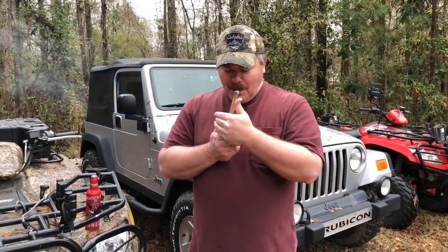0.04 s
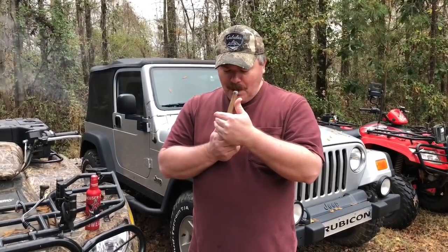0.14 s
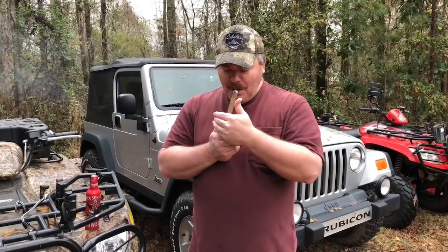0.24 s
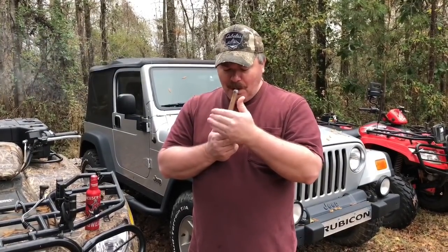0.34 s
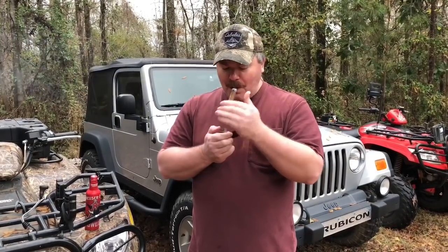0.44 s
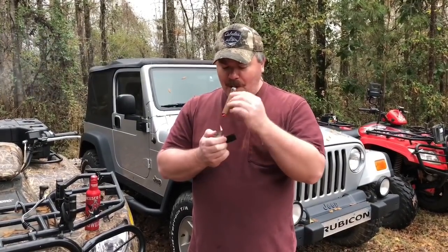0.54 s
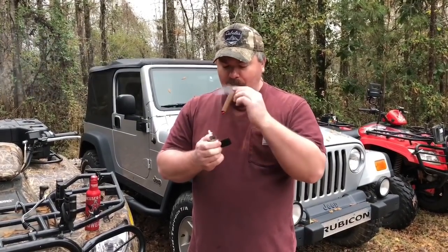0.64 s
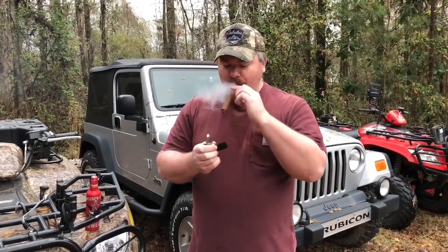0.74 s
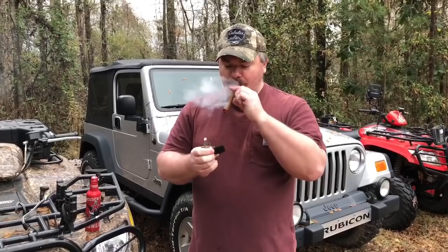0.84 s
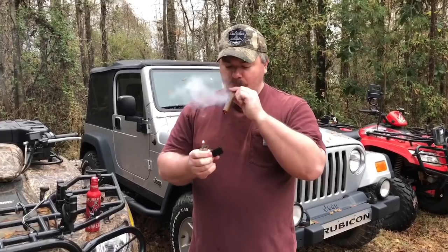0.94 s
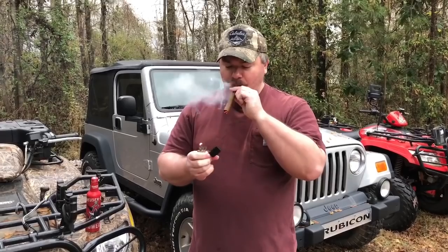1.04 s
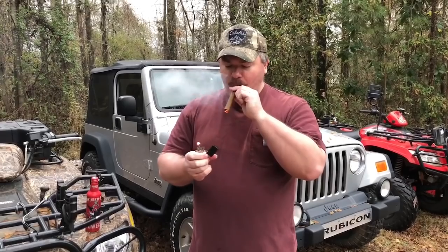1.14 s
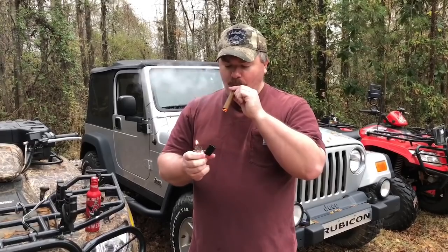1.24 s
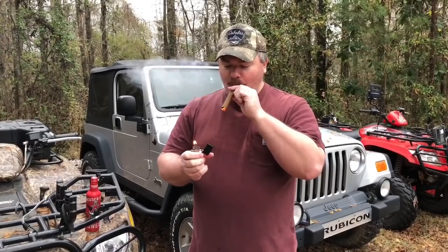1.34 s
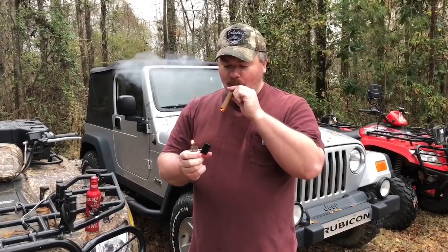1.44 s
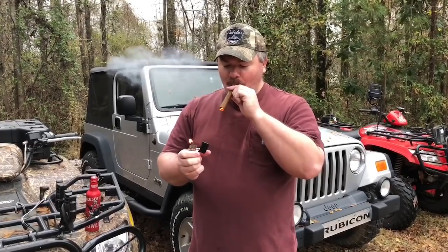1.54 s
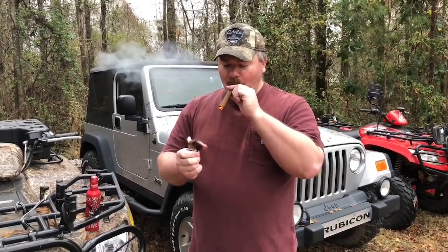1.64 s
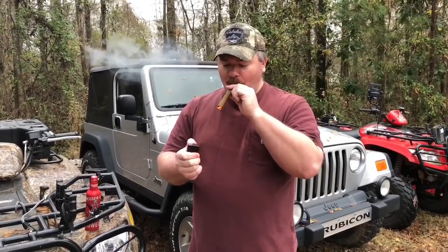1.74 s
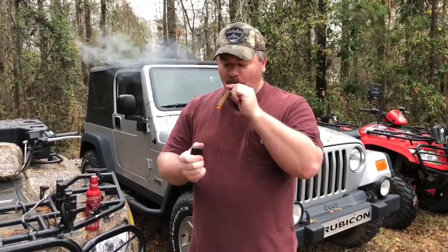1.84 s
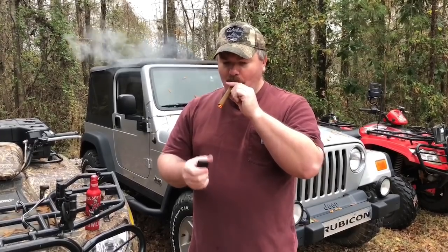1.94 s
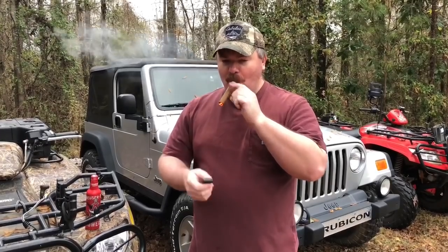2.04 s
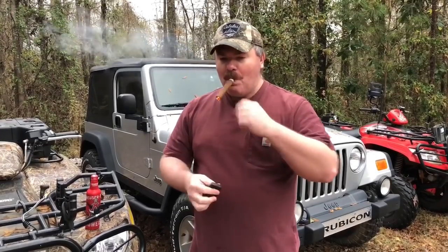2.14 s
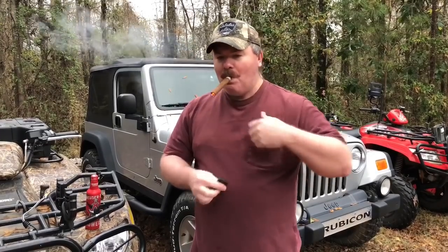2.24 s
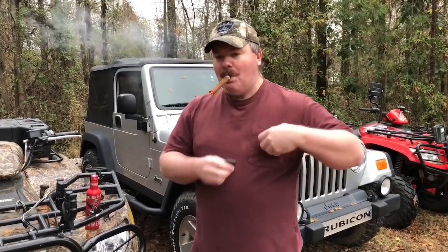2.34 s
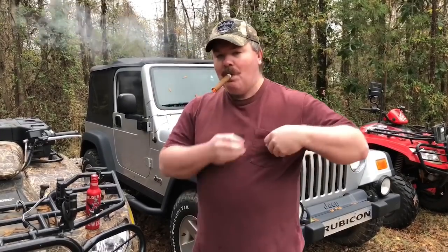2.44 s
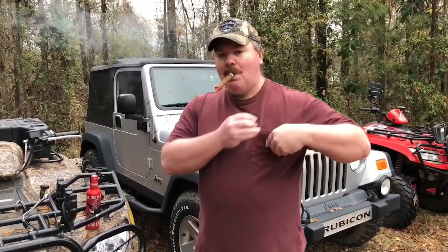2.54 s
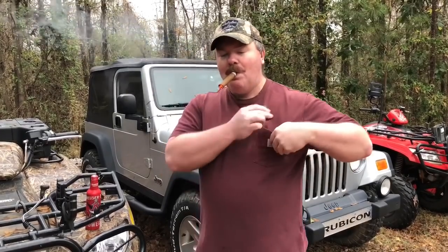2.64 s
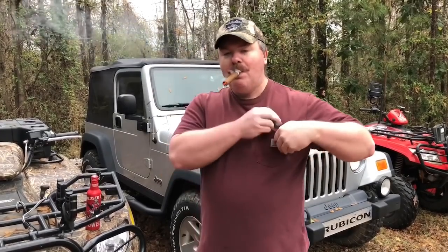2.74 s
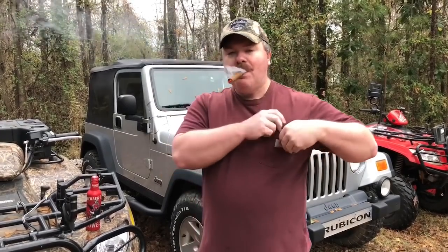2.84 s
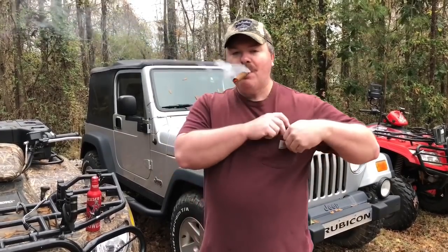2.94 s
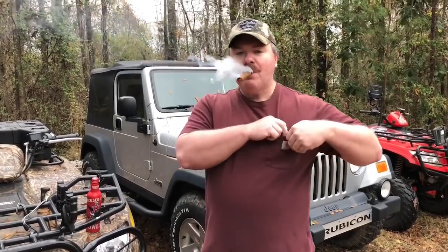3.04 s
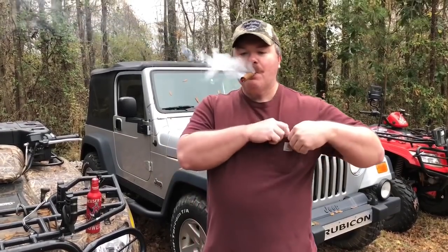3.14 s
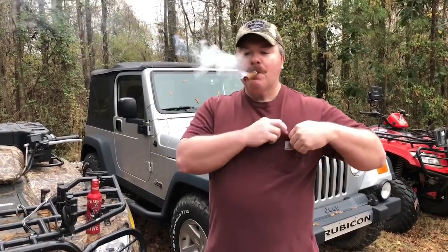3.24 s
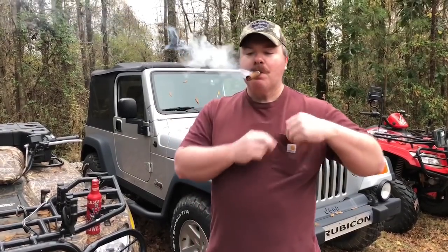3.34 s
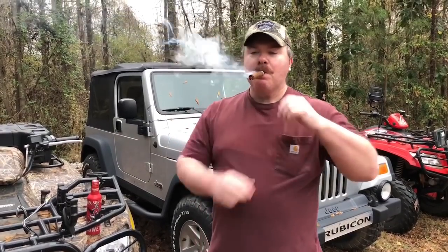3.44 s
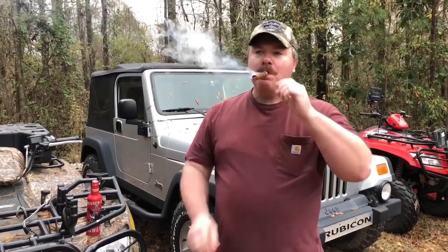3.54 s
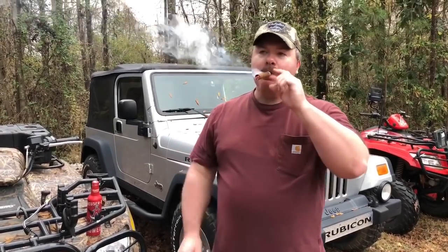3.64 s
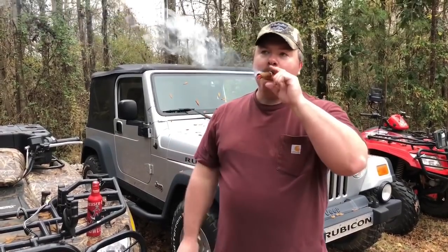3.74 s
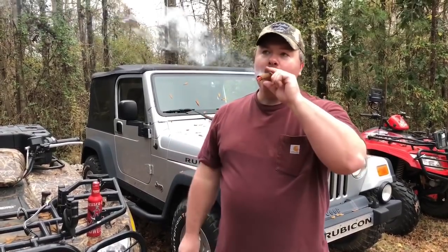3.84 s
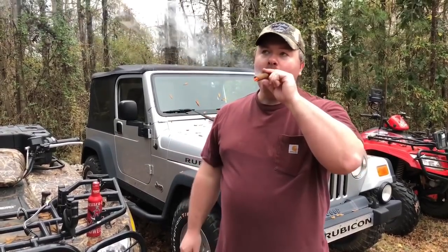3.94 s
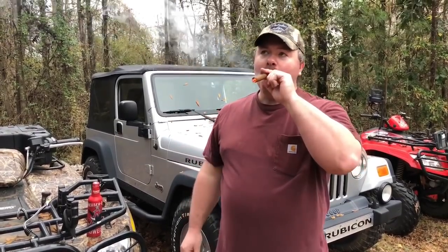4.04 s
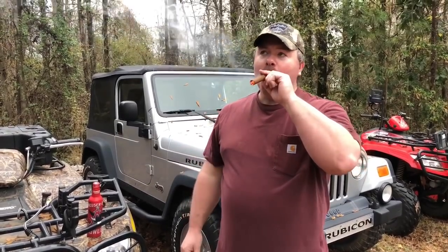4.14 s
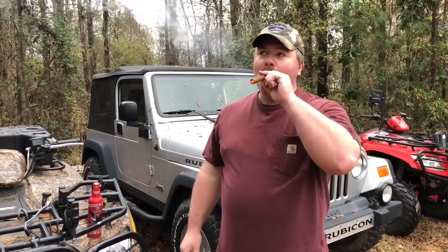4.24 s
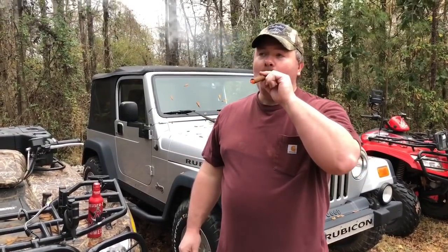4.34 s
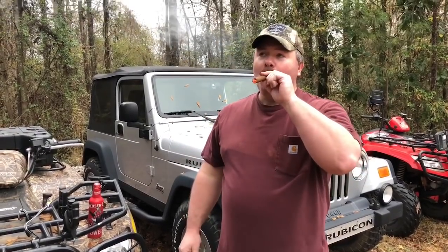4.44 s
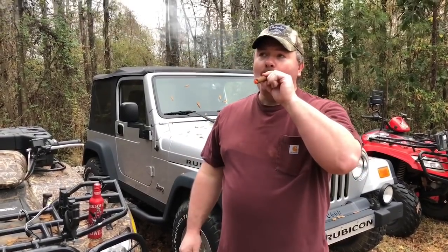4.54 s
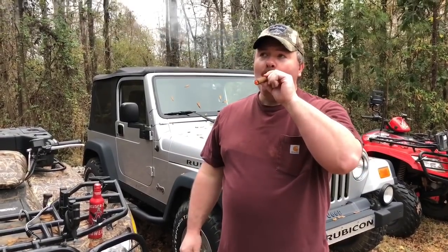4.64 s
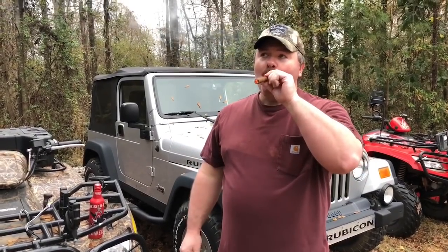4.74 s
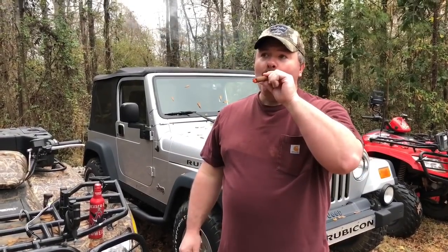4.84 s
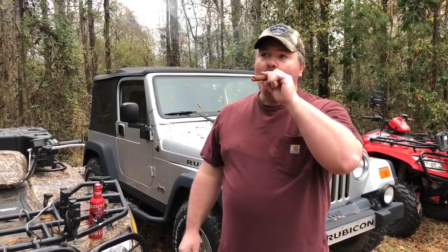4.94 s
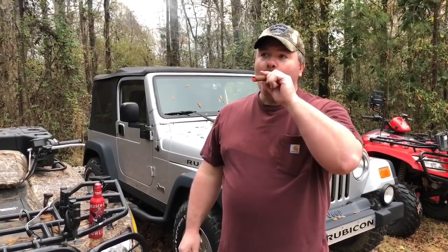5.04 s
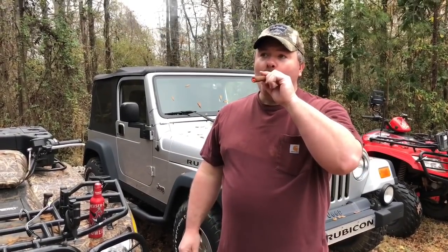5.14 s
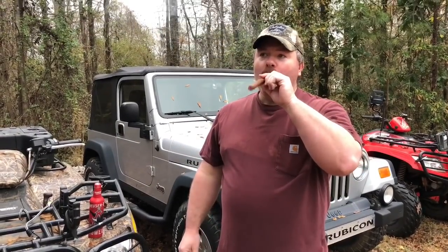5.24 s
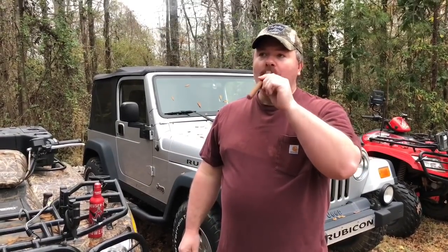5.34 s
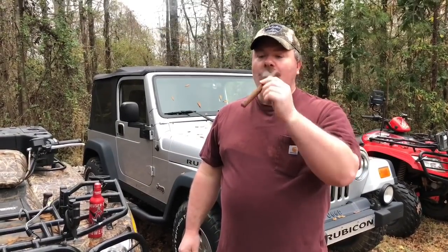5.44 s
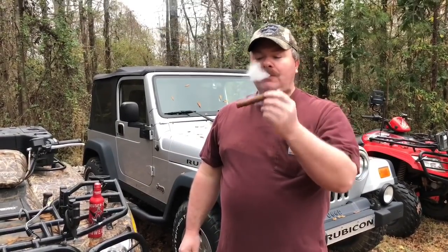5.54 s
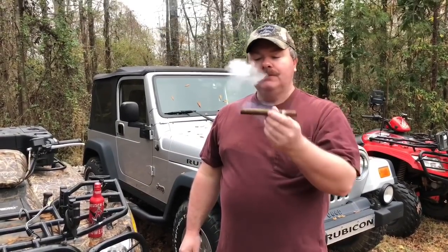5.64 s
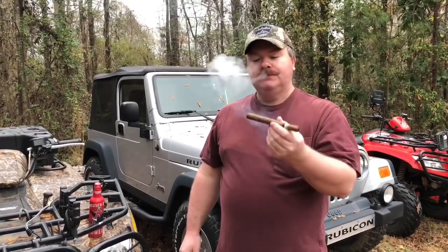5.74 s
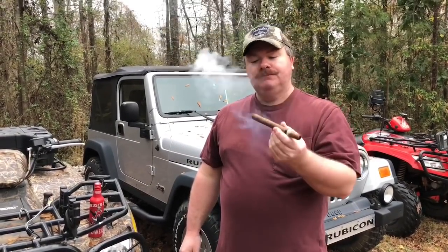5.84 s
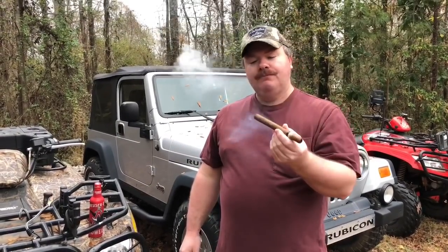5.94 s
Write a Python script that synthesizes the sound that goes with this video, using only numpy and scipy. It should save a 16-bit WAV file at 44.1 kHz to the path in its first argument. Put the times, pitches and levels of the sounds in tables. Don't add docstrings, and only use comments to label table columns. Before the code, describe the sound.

Outdoors among trees, a metal lighter clicks shut once, hard and bright; faint traffic murmur, sparse bird whistles, and tiny cloth rustles surround it.

```python
import sys
import numpy as np
from scipy import signal
from scipy.fft import rfft, irfft, next_fast_len
from scipy.io import wavfile
from scipy.ndimage import uniform_filter1d, map_coordinates

SR = 44100
rng = np.random.default_rng(int(sys.argv[2]) if len(sys.argv) > 2 else 0)


def linear_from_db(decibels):
    return 10 ** (np.asarray(decibels, float) / 20)


def bounce(signal):
    frames = np.transpose(np.atleast_2d(signal))
    limited = np.clip(frames, -1, 1)
    pcm = np.round(limited * 32767).astype(np.int16)
    wavfile.write(sys.argv[1], SR, pcm)


N = 264776
T = np.arange(N) / SR

# frequency_hz, density_db
RUMBLE_SPECTRUM = [(12, -60), (20, -35.5), (43, -9), (76, 2), (150, -6), (214, -12.5), (242, -16.5),
                   (400, -24.5), (520, -51), (880, -120)]
# frequency_hz, density_db
ROAR_SPECTRUM = [(150, -38.5), (250, -8), (320, -9.5), (545, -9), (790, -2.5), (995, -3.5), (1580, -7.5),
                 (2300, -16.5), (3200, -25), (4720, -31.5), (7000, -37), (10000, -41), (14000, -42),
                 (17200, -38.5)]
# time_s, level_db
TRAFFIC_LEVEL = [(0, -47), (.3, -51.5), (1.8, -50), (2.1, -52.5), (3.1, -50), (3.5, -51), (6, -52)]
ROAR_DB, ROAR_FADE_DB_PER_S = -54, 0.094
# time_s, pitch_hz, level_db
MOTOR_HUM = [(0, 292, -67.5), (1.34, 292.6, -61), (2.6, 295.7, -62.5), (3.6, 294.1, -67.5),
             (5.5, 294.4, -71.5), (6, 293.5, -65)]
# start_s, length_s, start_pitch_hz, end_pitch_hz, level_db
ENGINE_PASSES = [(0, 0.32, 184.7, 186, -62.5), (.35, 0.98, 186, 180, -58.5), (1.0, 1.03, 60, 60, -55),
                 (1.6, 1.53, 165.3, 152.4, -61.5), (2.151, 0.82, 315.3, 310, -68),
                 (2.302, 0.82, 105.6, 102.5, -56), (3.3, .9, 211.4, 216, -65),
                 (3.599, 1.45, 62.2, 58.7, -57.5), (4.9, 0.61, 218, 214.2, -66.5),
                 (5.5, 0.41, 184.8, 181.8, -61.5)]

# frequency_hz, density_db
CLOTH_SPECTRUM = [(2500, -120), (4000, -9), (8000, -3), (16000, 0.5), (20000, 0)]
# frequency_hz, density_db
LEAF_SPECTRUM = [(2500, -120), (4000, -2.5), (6000, -1), (8000, -3), (12000, -120)]
# peak_s, level_db, dying_time_s
SLEEVE_STROKES = [
    (1.65, -86.5, .5),
    (2.41, -77, .06),
    (2.48, -77.5, .05),
    (3.15, -75.5, .08),
    (3.29, -79, .15),
    (3.98, -74.5, .25),
    (4.8, -88, .15),
]
# peak_s, level_db, dying_time_s
BREEZE_GUSTS = [
    (.5, -89, .5),
    (4.8, -80.5, .2),
    (5.4, -82.5, .2),
]
SWELL_SHARE, STILL_DB = 0.76, -94

# start_s, start_pitch_hz, resting_pitch_hz, level_db
NEAR_CHIPS = [
    (.641, 8250, 7520, -58),
    (1.075, 7750, 7350, -71),
    (1.43, 8300, 7750, -82),
    (2.645, 7950, 7450, -73),
    (3.038, 8930, 7400, -63),
    (4.978, 8000, 7550, -83),
    (5.03, 7600, 7520, -83.5),
    (5.088, 7960, 7500, -83),
]
# start_s, length_s, pitch_hz, glide_percent, level_db
FARTHER_NOTES = [(2.01, .05, 4550, 3, -76), (2.09, 0.068, 4530, -1.5, -75), (2.23, 0.053, 4380, -10.5, -75),
                 (2.3, .07, 3760, 1, -78), (2.42, 0.093, 3900, 0, -75.5), (2.5, .1, 4500, -2, -75.5),
                 (4.57, 0.059, 4250, 4, -71), (4.64, .03, 4130, -10.5, -75.5), (5.04, .1, 4507, 0, -77),
                 (5.26, .06, 4350, -5, -76), (5.33, .05, 3920, -6, -75.5)]
# start_s, length_s, top_pitch_hz, level_db
FAR_WHISTLES = [
    (3.553, .044, 4780, -65),
    (3.906, .062, 4580, -66),
    (4.197, .047, 4650, -66),
    (4.498, .042, 4500, -70),
    (4.985, .05, 4580, -73),
]
GRACE_LEVELS = [-71.5, -73, -68.5]
# start_s, length_s, pitch_hz, glide_percent, level_db
FAR_ASIDES = [
    (4.25, .015, 4400, 9, -71),
    (4.69, .025, 3950, -8, -73),
    (4.905, .04, 3700, -4, -76),
    (5.215, .045, 4500, -11, -74),
]

# start_s, peak_level_db, centre_hz
FIBRE_CRACKS = [(.7444, -62, 8020), (.8344, -67, 14510), (1.5526, -66, 9000), (1.6685, -67, 14000),
                (1.6797, -54, 15000), (1.7184, -64, 14500), (1.7432, -44, 13130), (1.928, -60, 7460),
                (2.451, -64, 10500), (2.488, -63, 15000), (2.729, -63, 14500), (2.2964, -68, 5500),
                (2.9854, -53, 16000), (3.4064, -62, 6000), (3.695, -52, 16000), (3.8084, -63, 8530),
                (3.8524, -57.5, 6500), (3.9083, -50, 10980), (3.9475, -56.5, 12000), (3.972, -62, 10000),
                (3.9895, -65, 8985), (4.0174, -63, 15000), (4.0712, -51, 6500), (4.197, -67, 15000),
                (4.2194, -61, 9490), (4.2546, -63.5, 9500), (4.2714, -60, 7000), (4.298, -67, 14000),
                (4.9194, -72, 11950)]
FAINT_DB, FAINT_OCTAVES, OCTAVES_PER_DB, WIDEST_OCTAVES = -62, .4, .1, 1.2
# start_s, peak_level_db, centre_hz, width_octaves
CASE_KNOCKS = [
    (1.722, -52, 2800, 0.13),
    (2.3612, -57, 4200, .36),
    (2.8376, -53, 3500, 0.32),
    (2.8415, -56, 3600, .35),
    (2.878, -48, 3400, .12),
    (2.8927, -63, 4490, .3),
]
# frequency_multiple, peak_level_db
DROP_PARTIALS = [(1, -50), (2, -55), (3, -57), (5, -65)]
DROP_S, DROP_HZ = 2.8762, 1690

# start_s, level_db, decay_t60_s
CAM_FLIP = [
    (1.7499, -41, .06),
]
# frequency_hz, density_db
CAM_SPECTRUM = [(1180, -46), (2000, -18), (2970, 2.5), (7870, -8.5), (9120, -27.5), (9900, -15.5),
                (15400, -16.5), (18000, -32)]
# start_s, blow_db, contact_time_ms, brightness_db_per_octave
LID_CONTACTS = [
    (1.7633, -20, 6, 4),
    (1.7657, 13.5, .005, -1.5),
    (1.7661, -10, .4, 1),
    (1.7667, -6, .4, 1),
    (1.7671, -9, .7, 1),
]
BLOW_S = LID_CONTACTS[1][0]
# centre_hz, width_hz, level_db
CASE_MODES = [(1375, 250, -9.5), (1824, 230, -2.5), (2380, 220, -7.5), (2765, 250, -1), (3390, 500, -6.5),
              (4350, 600, -2), (4950, 500, -4.5), (6300, 1300, -6.5), (8790, 394, -11.5), (10084, 420, -2),
              (12430, 440, -7.5), (14990, 500, -4), (15950, 400, -6), (16950, 340, -3)]
# pitch_hz, level_db, decay_t60_s
SHELL_MODES = [(1380, -32.5, 0.032), (1787, -25.5, .05), (2050, -30, 0.074), (2350, -49.5, 0.3975),
               (2377.1, -29.5, 0.058), (3060, -40, .06), (4360, -37.5, 0.07), (10100, -41, .06),
               (10000, -59, .4)]
# frequency_hz, density_db
RADIATED_SPECTRUM = [(1180, -30.5), (2000, 0), (2190, -7.5), (2350, -3.5), (3030, -11.5), (4720, -7.5),
                     (5400, -11), (17300, -8.5)]
# frequency_hz, decay_t60_s
TREE_DECAY = [(1000, .3), (3000, 0.94), (5000, 0.59), (8000, 0.47), (16000, .32)]
FIRST_WALL_S, NEXT_WALL, WALL_DB, WALL_LOSS_DB_PER_S = .0032, 1.33, -22.5, 560


def unit(x):
    return x / np.sqrt(np.mean(x ** 2) + 1e-20)


def along(points, hz):
    f, v = np.transpose(points)
    return np.interp(np.log(hz + 1), np.log(f + 1), v)


def curves(rows):
    s, *columns = np.transpose(rows)
    return [np.interp(T, s, column) for column in columns]


def wobble(rate):
    knots = rng.standard_normal(int(N * rate / SR) + 4)
    return map_coordinates(knots, [T * rate])


def filtered(x, response):
    m = next_fast_len(len(x) + 8192)
    spectrum = rfft(x, m) * response(np.fft.rfftfreq(m, 1 / SR))
    return irfft(spectrum, m)[:len(x)]


def noise(spectrum, length):
    white = rng.standard_normal(length)
    return unit(filtered(white, lambda hz: linear_from_db(along(spectrum, hz))))


def add(track, s, sound):
    part = track[round(s * SR):][:len(sound)]
    part += sound[:len(part)]


def trees(x, gap):
    hz, t, z = signal.stft(rng.standard_normal(SR // 2), SR, nperseg=256)
    decay = linear_from_db(-60 * t / along(TREE_DECAY, hz)[:, None])
    tail = signal.istft(z * decay, SR, nperseg=256)[1]
    tail = np.pad(tail / np.linalg.norm(tail), (round(gap * SR), 0))
    return signal.fftconvolve(x, tail)


def traffic():
    rumble_db = curves(TRAFFIC_LEVEL)[0]
    rumble = linear_from_db(rumble_db - 0.5 + 0.83 * wobble(6.1)) * noise(RUMBLE_SPECTRUM, N)
    roar_db = ROAR_DB - ROAR_FADE_DB_PER_S * T
    roar = linear_from_db(roar_db + 0.5 + .4 * wobble(3.3) + 0.51 * wobble(10)) * noise(ROAR_SPECTRUM, N)
    hz, db = curves(MOTOR_HUM)
    hum_gain = linear_from_db(db + 2.0 + 1.3 * wobble(3.3))
    hum = hum_gain * np.sin(2 * np.pi * np.cumsum(hz + 0.53 * wobble(6)) / SR)
    return rumble + roar + hum


def engines():
    out, drift_hz = np.zeros(N), 2.5 * wobble(8)
    for s, length, start_hz, end_hz, db in ENGINE_PASSES:
        u = np.arange(round(length * SR)) / (length * SR)
        hz = start_hz + (end_hz - start_hz) * u + np.resize(drift_hz[round(s * SR):], len(u))
        envelope = linear_from_db(db + 2.0) * np.sin(np.pi * u) ** .6
        add(out, s, envelope * np.sin(2 * np.pi * np.cumsum(hz) / SR))
    return out * linear_from_db(2.7 * wobble(8))


def swells(rows):
    s, db, dying = np.transpose(rows)[:, :, None]
    fall_db = 10 * np.maximum((T - s) / dying, (s - T) / (SWELL_SHARE * dying))
    return np.maximum((db - fall_db).max(axis=0), STILL_DB)


def rustle():
    grain = linear_from_db(2.5 * wobble(40) + 3 * wobble(400))
    sleeve = linear_from_db(swells(SLEEVE_STROKES)) * unit(grain * noise(CLOTH_SPECTRUM, N))
    leaves = linear_from_db(swells(BREEZE_GUSTS) + 1.5 * wobble(11)) * noise(LEAF_SPECTRUM, N)
    return sleeve + leaves


def bird(notes, turn, swell, warble_hz, flutter_db, dry_db, wet_db):
    out = np.zeros(N)
    flutter, warble = linear_from_db(flutter_db * wobble(90)), warble_hz * wobble(70)
    for s, length, start_hz, turn_hz, end_hz, db in notes:
        u = np.arange(round(length * SR)) / (length * SR)
        hz = np.interp(u, [0, turn, 1], [start_hz, turn_hz, end_hz])
        hz = uniform_filter1d(hz, size=len(u) // 4, mode="nearest")
        hz = hz + warble[round(s * SR):][:len(u)]
        envelope = linear_from_db(db + 3.5) * np.sin(np.pi * u ** swell) ** 0.39
        note = envelope * np.sin(2 * np.pi * np.cumsum(hz) / SR)
        add(out, s, linear_from_db(dry_db) * note)
        add(out, s, linear_from_db(wet_db) * trees(note, gap=.008))
    return out * flutter


def chips():
    return [(s, .037, start_hz, hz, hz, db) for s, start_hz, hz, db in NEAR_CHIPS]


def ticks():
    out, t = np.zeros(N), T[:SR // 100]
    cracks = []
    for s, db, hz in FIBRE_CRACKS:
        octaves = FAINT_OCTAVES + OCTAVES_PER_DB * (db - FAINT_DB)
        cracks.append((s, db, hz, min(octaves, WIDEST_OCTAVES)))
    drop = [(DROP_S, db, k * DROP_HZ, .15) for k, db in DROP_PARTIALS]
    for s, db, centre_hz, octaves in cracks + CASE_KNOCKS + drop:
        width = max(octaves, .12)
        burst = rng.standard_normal(len(t)) * np.exp(-t / .0006)
        burst = filtered(burst, lambda hz: np.exp(-.5 * (np.log2(hz / centre_hz + 1e-3) / width) ** 2))
        add(out, s, linear_from_db(db + 3.5) * burst / np.abs(burst).max())
    return out


def case_response(hz):
    response = linear_from_db(-18.5)
    for k, (centre, width, db) in enumerate(CASE_MODES):
        damping = 1j * hz * width
        response = response + (-1) ** k * linear_from_db(db) * damping / (centre ** 2 - hz ** 2 + damping)
    return response


def lid():
    force, t = np.zeros(N), T[:SR // 50]
    for s, db, ms, tilt_db in LID_CONTACTS:
        scrape = np.r_[1, rng.standard_normal(len(t) - 1)] * np.exp(-t * 1000 / ms)
        add(force, s, linear_from_db(db) * filtered(scrape, lambda hz: linear_from_db(tilt_db * np.log2(hz / 6000 + 0.06))))
    snap = linear_from_db(4.0) * filtered(force, case_response)
    t = T[:SR // 2]
    ring = sum(linear_from_db(db - 60 * t / t60) * np.sin(2 * np.pi * hz * t) for hz, db, t60 in SHELL_MODES)
    add(snap, BLOW_S, ring * (1 - np.exp(-t / .0006)))
    for s, db, t60 in CAM_FLIP:
        add(snap, s, linear_from_db(db - 60 * t / t60) * noise(CAM_SPECTRUM, len(t)))
    radiate = signal.butter(8, 1150, "highpass", fs=SR, output="sos")
    return signal.sosfilt(radiate, snap) + linear_from_db(-11) * snap


def clearing(x):
    early, t = np.zeros(SR // 10), T[:SR // 200]
    for delay in FIRST_WALL_S * NEXT_WALL ** np.arange(9):
        db = WALL_DB - WALL_LOSS_DB_PER_S * (delay - FIRST_WALL_S)
        smear = rng.standard_normal(len(t)) * np.exp(-t / 0.00084)
        add(early, delay, linear_from_db(db) * smear / np.linalg.norm(smear))
    out = x + signal.fftconvolve(x, early)[:N]
    answer = filtered(trees([1], gap=.006), lambda hz: linear_from_db(along(RADIATED_SPECTRUM, hz)))
    add(out, BLOW_S, linear_from_db(-3.5) * answer)
    return out


def glides(rows, turn):
    notes = []
    for s, length, hz, percent, db in rows:
        start_hz = hz * (1 - turn * percent / 100)
        end_hz = hz * (1 + (1 - turn) * percent / 100)
        notes.append((s, length, start_hz, hz, end_hz, db))
    return notes


def song():
    graces = [(s - .035, .013, 5350, 4950, 3650, db) for (s, *_), db in zip(FAR_WHISTLES, GRACE_LEVELS)]
    whistles = []
    for s, length, hz, db in FAR_WHISTLES:
        end_hz = hz - 5500 * length - 2.2 * max(hz - 4560, 0)
        whistles.append((s, length, 3500, hz, end_hz, db))
    return graces + whistles + glides(FAR_ASIDES, turn=.4)


def scene():
    near = bird(chips(), turn=.4, swell=0.96, warble_hz=60, flutter_db=2, dry_db=1.0, wet_db=-7)
    far = bird(song(), turn=.13, swell=.8, warble_hz=35, flutter_db=1.5, dry_db=0, wet_db=-4.5)
    farther = bird(glides(FARTHER_NOTES, turn=.4), turn=0.3994, swell=0.65, warble_hz=140, flutter_db=3,
                   dry_db=-10, wet_db=-2.5)
    lighter = clearing(lid())
    return (lighter + near + far + farther + ticks() + rustle() + traffic() + engines())[None]


def low_pass(x):
    return signal.sosfilt(signal.butter(12, 19080, fs=SR, output="sos"), x)


def record(dry):
    return low_pass(dry)


dry = scene()
out = record(dry)
bounce(out)
```